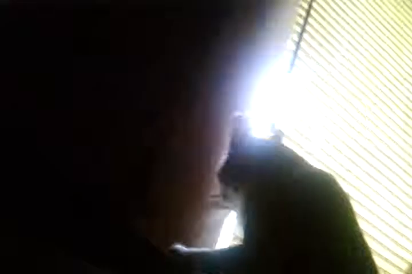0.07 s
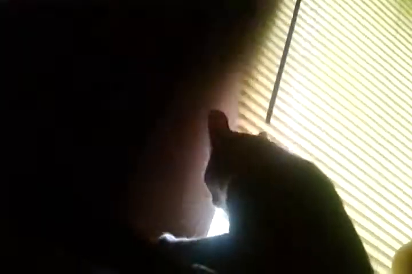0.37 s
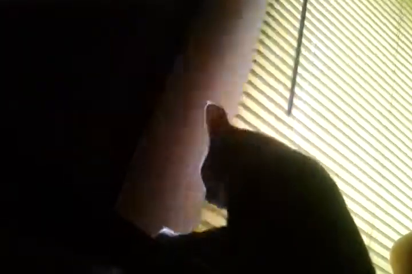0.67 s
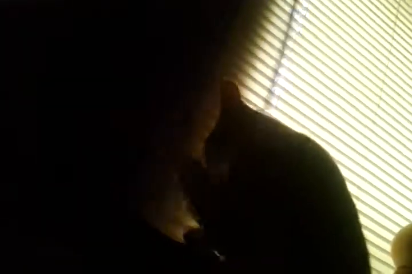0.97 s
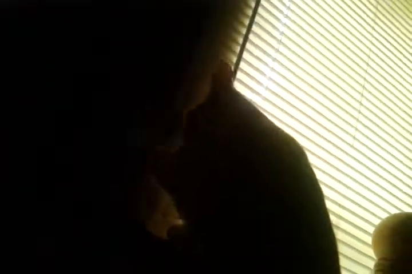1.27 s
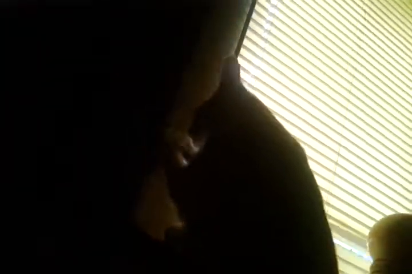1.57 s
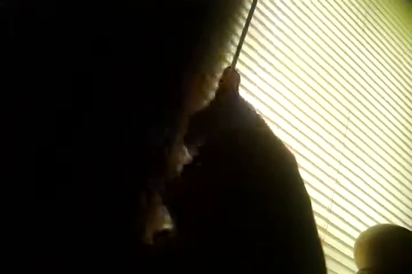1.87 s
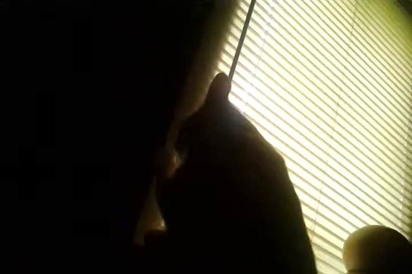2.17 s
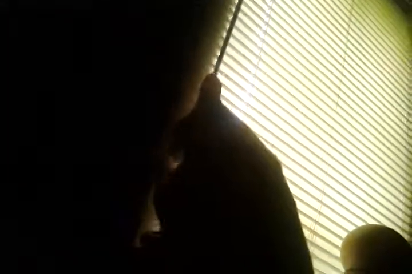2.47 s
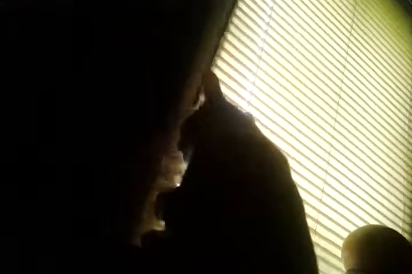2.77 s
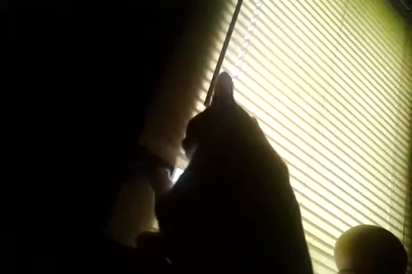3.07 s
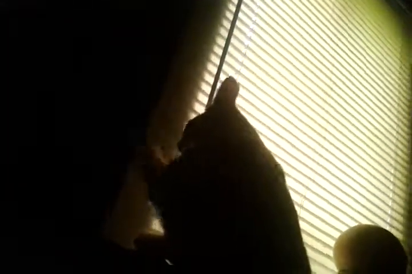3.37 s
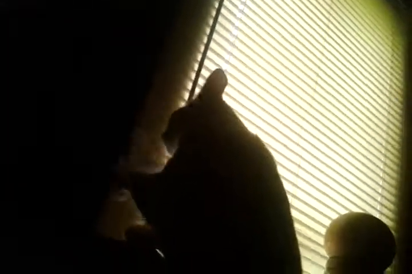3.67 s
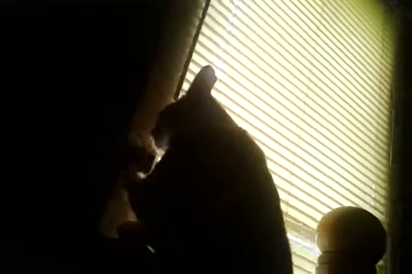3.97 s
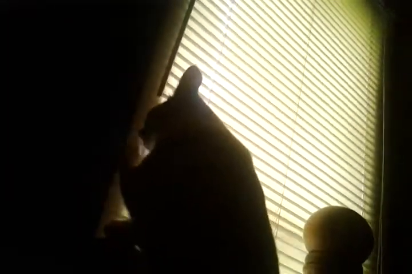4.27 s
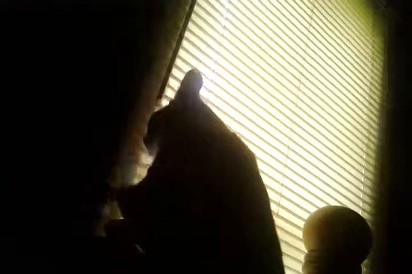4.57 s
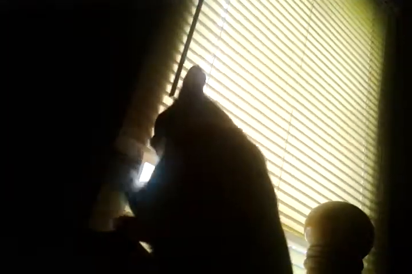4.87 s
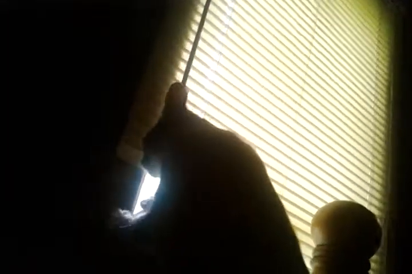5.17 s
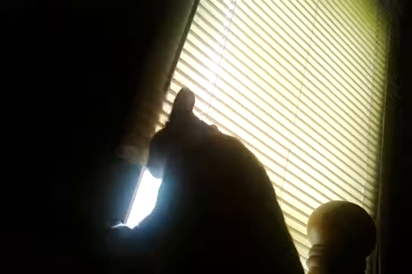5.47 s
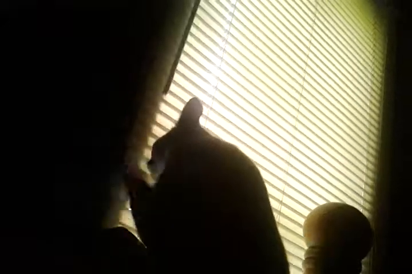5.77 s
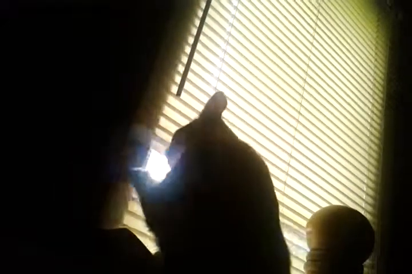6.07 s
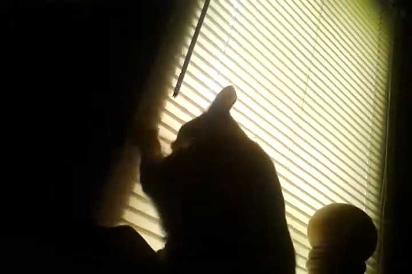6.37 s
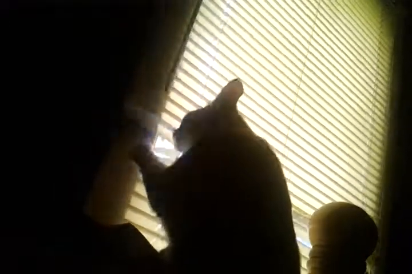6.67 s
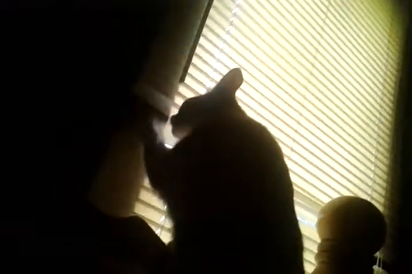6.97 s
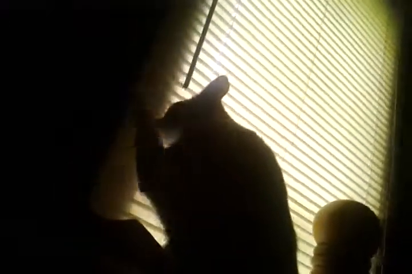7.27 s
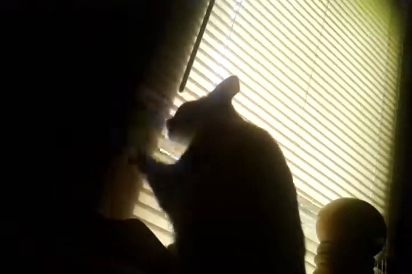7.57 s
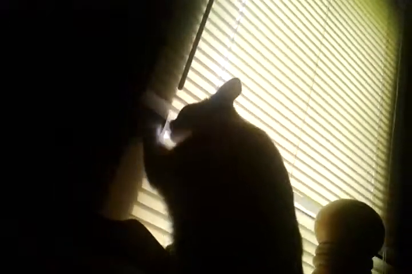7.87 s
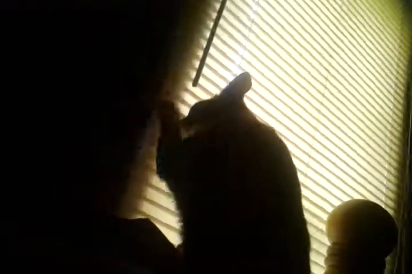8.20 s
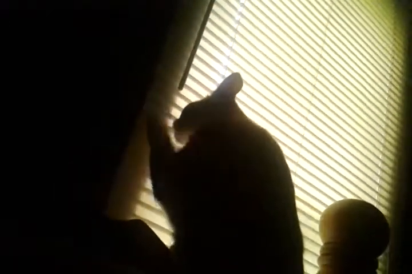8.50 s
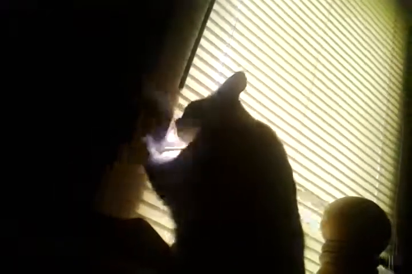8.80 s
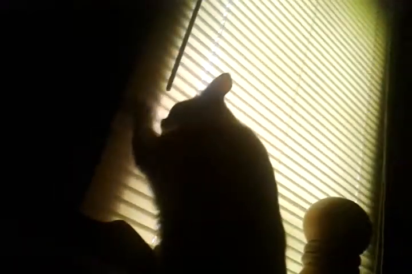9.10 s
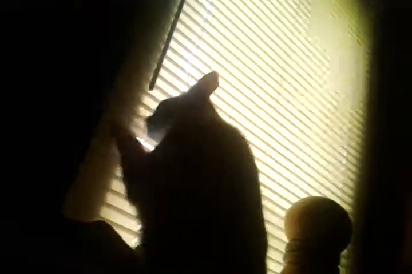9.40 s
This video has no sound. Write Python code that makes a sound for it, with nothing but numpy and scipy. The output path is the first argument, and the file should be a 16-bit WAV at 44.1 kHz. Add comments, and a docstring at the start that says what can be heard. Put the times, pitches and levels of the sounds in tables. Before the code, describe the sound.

Window blinds rustle, click and clatter in short bursts under a cat's paw, with a few soft bumps over faint hiss.

```python
"""A small quiet room, where a cat paws at slatted window blinds about twice a second.
In each stroke the paw lands with a soft knock, drags ever more brightly over the slats by stick-slip
friction and slips off; bent slats slap back in short runs, each impact exciting their resonances.
Now and then something bumps softly, probably the cat against the sill. Mains hum and hiss lie underneath."""
import sys
import numpy as np
from scipy import signal
from scipy.fft import rfft, irfft, next_fast_len
from scipy.io import wavfile

SR = 44100
rng = np.random.default_rng(int(sys.argv[2]) if len(sys.argv) > 2 else 0)


def inscribe(sig):
    """Save sig as 16-bit PCM at rate SR to the path in sys.argv[1].

    A 1-D sig is mono; a 2-D sig holds one channel per row.
    Samples are clipped to [-1, 1] before scaling.
    """
    pcm = np.round(np.clip(np.atleast_2d(sig).T, -1, 1) * 32767)
    wavfile.write(sys.argv[1], SR, pcm.astype(np.int16))


N = 425124

# Spectra of the hiss, the friction, the reverberation and the microphone.
# Each row: frequency in Hz, relative gain in dB.
HISS_SPECTRUM = [(25, -31), (45, -17), (80, -16), (120, -6), (180, -5.5), (400, -5.5), (680, -6.5),
                 (900, -8), (1200, -8.5), (1600, -11), (2000, -14), (3200, -16), (4500, -18), (6300, -19),
                 (8800, -31.5)]
FRICTION_SPECTRUM = [(150, -50.5), (250, -20.5), (511, -10.5), (559, -17.5), (699, -5), (765, -6.5),
                     (1030, -4), (1110, -8), (1410, -9), (1840, -14), (3200, -7.5), (4440, -14.5),
                     (5800, -11.5), (7050, -16.5), (8810, -43), (11500, -83), (19400, -120)]
REVERB_SPECTRUM = [(80, -3), (200, 2), (450, -1.5), (750, -4.5), (1250, -1.5), (1900, -1), (3200, -2.5),
                   (4400, 1.5), (6000, 1.5), (8500, 1.5)]
MIC_RESPONSE = [(40, -0.5), (400, 0), (1200, 1.5), (1800, 0.5), (2600, 0.5), (4300, 2), (6200, 0.5),
                (7200, 0), (7900, -7.5), (8800, -16)]
# Runs of slats slapping back. Each row: start in seconds, length in seconds (zero for a single slap),
# relative knock level in dB, pitch of the first knock in Hz, relative snap level in dB.
SLAP_RUNS = [(0.83, 0, -51.5, 1270, -49), (1.28, 0, -40.5, 680, -47.5), (1.352, 0, -37.5, 1310, -61),
             (1.433, 0, -42, 1100, -53.5), (1.827, 0, -47, 610, -50.5), (1.9, .008, -31, 1210, -38.5),
             (1.932, 0.00011, -34, 1000, -33.5), (2.187, 0.0092, -35.5, 1100, -42),
             (2.408, 0, -43.5, 990, -53), (2.539, 0.00028, -34.5, 890, -42.5), (2.722, 0, -55, 1100, -49.5),
             (2.985, 0.0046, -34, 980.7, -38.5), (3.38, 0.00018, -46.5, 818, -45.5),
             (3.444, 0, -41, 1080, -46.5), (3.689, 0.00012, -40, 1200, -43),
             (3.73, 0.00015, -41.5, 956, -33), (3.761, 0.00045, -34.5, 1040, -38.5),
             (3.796, .016, -30, 1210, -36), (4.184, .025, -29.5, 916, -36.5), (4.522, 0, -51, 1350, -44.5),
             (4.594, 0.00037, -34, 1280, -39.5), (4.639, 0, -35, 670, -37.5), (4.658, 0, -27.5, 905, -35),
             (5.057, 0, -53, 1200, -45.5), (5.212, .004, -24.5, 800, -35.5), (5.261, 0, -41.5, 732, -36),
             (5.584, 0, -61, 889.7, -41.5), (5.669, 0.0005, -37, 1150, -44.5),
             (5.712, 0.00013, -43, 1201, -44), (5.927, 0.00027, -39.5, 1290, -42.5),
             (6.275, 0, -48.5, 670, -45.5), (6.367, 0.00024, -28.5, 950.3, -36),
             (6.843, .009, -30.5, 1150, -35), (6.867, 0, -35, 1069, -30), (7.031, 0, -41.5, 940, -44),
             (7.131, 0, -33.5, 721, -41.5), (7.253, 0.00012, -34.5, 730, -39),
             (7.274, .007, -25.5, 1240, -32.5), (7.293, 0, -28, 1150, -31), (7.309, 0, -39, 1250, -35),
             (7.544, 0.00047, -40, 684, -44.5), (7.712, 0, -29, 683.5, -28.5), (7.719, 0, -26, 1230, -30.5),
             (8.119, 0, -27.5, 795.6, -31), (8.13, .024, -38.5, 960, -36),
             (8.434, 0.00029, -43, 659, -39.5), (8.555, 0.019, -28, 869.4, -35.5),
             (8.763, 0.00034, -38.5, 890, -41.5), (8.98, 0.00023, -26.5, 890, -34),
             (9.001, 0, -37, 990, -28.5), (9.012, .016, -25.5, 1020, -33), (9.299, 0, -38, 724, -48),
             (9.489, 0.0002, -39, 1000, -41), (9.51, .004, -26, 1001, -35),
             (9.539, 0.00073, -35, 1170, -38)]
# Along a run the slats are struck nearer the edge. Each row: share of the run, change of knock in dB,
# change of snap in dB.
RUN_PROFILE = [(0, 0, 0), (.5, -5, -1), (1, -4.5, 1)]
# A light touch scuffs, a hard one clicks. Each row: relative snap level in dB, contact time in seconds.
CONTACT_TIMES = [(-48.5, 0.0044), (-40.5, 0.0026), (-32.5, 0.00096)]
# Broad resonances of bending slats, of their clicking edges and of the sill.
# Each row: frequency in Hz, bandwidth in Hz, gain in dB.
BENDING_MODES = [(213, 420, -11), (467, 118, -2.5), (700, 146, 1), (952, 167, 0.5), (1253, 278, -0.5)]
CLICK_MODES = [(2500, 594, -1), (3400, 630, 2), (4570, 1540, -4), (5600, 1020, 2.5), (6405, 1330, -3)]
THUD_MODES = [(170, 66, -0.5), (320, 77, -0.5), (447, 130, -8)]
# Early reflections from pane, frame and wall. Each row: mean delay in seconds, gain.
REFLECTIONS = [(.0029, 0.31), (0.01, 0.19)]
# Soft bumps on the sill. Each row: start in seconds, relative level in dB.
SILL_BUMPS = [(1.432, -39.5), (2.332, -56), (2.605, -58), (3.493, -42.5), (6.73, -53), (7.742, -49),
              (8.158, -47), (8.64, -45.5), (9.02, -57)]
# The direct thud and its returns from the walls. Each row: delay in seconds, gain.
THUD_PATHS = [(0, 1), (.023, 0.54), (.053, .3)]
# Strokes of the paw. Each row: landing and slip-off in seconds, relative levels of landing knock,
# landing snap, rub and scrape in dB, swell at the slip in dB.
PAW_STROKES = [(1.664, 1.96, -45, -50.5, -53.5, -53.5, 0), (2.07, 2.21, -38, -60, -58.5, -60, 13),
               (2.373, 2.541, -40, -58, -55, -59, 6), (2.699, 2.955, -42, -57, -59.5, -60, 10),
               (3.183, 3.29, -49, -49.5, -55.5, -57, 0), (3.583, 3.821, -41.5, -53.5, -56, -57.5, 5),
               (3.981, 4.18, -38, -41.5, -51.5, -52, 3), (4.375, 4.62, -41.5, -60, -55, -58, 11),
               (4.884, 5.21, -42, -49, -52, -50.5, 0), (5.909, 5.98, -48, -46.5, -60, -60, 0),
               (6.043, 6.16, -44.5, -45.5, -53, -54.5, 3), (6.485, 6.67, -40, -42.5, -49.5, -54.5, 0),
               (6.785, 6.845, -60, -55, -57, -54, 9), (6.98, 7.25, -47.5, -49, -50.5, -49.5, 0),
               (7.489, 7.715, -41.5, -43, -50, -51.5, 7), (7.908, 8.11, -44, -46, -49, -49.5, 8),
               (8.16, 8.225, -47, -46, -49, -47, 0), (8.35, 8.56, -47, -49, -47, -48, 2),
               (8.726, 8.985, -40, -39, -51.5, -51, 4), (9.19, 9.31, -49, -47, -49, -48.5, 0),
               (9.441, 9.51, -62, -47, -56, -53, 8)]
# The opening fade. Each row: time in seconds, gain in dB; the last gain holds.
OPENING_GAIN = [(.775, -70), (.787, -15.5), (.825, -17), (.835, -9.5), (1.1, -4.5)]

HUM_HZ, HUM_DB = 58, -71.5
SLAT_GAP_S = .017  # longest gap between the slaps of a run
SLAT_HZ, SLAT_SPREAD, PAD_HZ = 1050, .2, 860  # slat pitch, its relative scatter, landing pitch
CATCH_KNOCK_DB, CATCH_SNAP_DB = 5, 1.5  # a claw catching, added to the stroke's rub and scrape
GRIP_S, RELEASE_T60_S = .02, 0.32  # the drag sets in and dies away
RUB_SAG_DB, SCRAPE_RISE_DB = 3, 1  # change over one stroke
SCRAPE_HZ = 2000  # rub lies below, scrape above
SLIP_S, SLIP_RUB_SHARE = .055, .6  # half-width of the swell at the slip; the rub's share of its dB
MIC_CUTOFF_HZ = 8850


def undb(db):
    """Amplitude grows tenfold for every 20 dB."""
    return 10 ** (np.asarray(db) / 20)


def unit(x):
    """Energy, the sum of squares, is normalised to one."""
    return x / np.sqrt(np.sum(x ** 2))


def level(x, db):
    """Rms amplitude is set to a level in dB."""
    return x * undb(db) / np.sqrt(np.mean(x ** 2))


def decay(t, t60):
    """Damping is exponential: 60 dB in t60 seconds."""
    return np.exp(-np.log(1000) * t / t60)


def add(track, s, sound):
    """Superposition: a sound joins the track at s seconds."""
    start = int(s * SR)
    part = sound[:max(len(track) - start, 0)]
    track[start:start + len(part)] += part


def colour(x, spectrum):
    """Filtering multiplies the spectrum by a gain curve."""
    hz, db = np.transpose(spectrum)
    size = next_fast_len(2 * len(x))
    log_hz = np.log(np.fft.rfftfreq(size, 1 / SR) + 1)
    gain = undb(np.interp(log_hz, np.log(hz), db))
    return irfft(rfft(x, size) * gain, size)[:len(x)]


def high_pass(x, hz):
    """A second-order filter sheds 12 dB an octave below its corner."""
    return signal.sosfilt(signal.butter(2, hz, "high", fs=SR, output="sos"), x)


def wander(rate_hz):
    """Interpolated noise drifts with a spread near one."""
    steps = rng.standard_normal(N // 100)
    return np.interp(np.arange(N) / SR * rate_hz, np.arange(len(steps)), steps)


def hiss_and_hum():
    """Broadband noise lies over mains hum, which wavers by slight phase modulation."""
    hum = np.sin(2 * np.pi * HUM_HZ * np.arange(N) / SR + .12 * wander(rate_hz=5))
    hiss = colour(rng.standard_normal(N), HISS_SPECTRUM)
    return level(hiss, -57.0) + level(hum, HUM_DB)


def slat_pitch():
    """Knock pitches scatter log-normally from slat to slat."""
    return SLAT_HZ * np.exp(SLAT_SPREAD * rng.standard_normal())


def slaps():
    """Elastic recoil: bent slats let go in turn, the later blows less knock and more snap."""
    shares, knock_change, snap_change = np.transpose(RUN_PROFILE)
    for s, length_s, knock_db, knock_hz, snap_db in SLAP_RUNS:
        for share in np.linspace(0, 1, 1 + int(np.ceil(length_s / SLAT_GAP_S))):
            yield (s + share * length_s, knock_db + np.interp(share, shares, knock_change),
                   slat_pitch() if share else knock_hz, snap_db + np.interp(share, shares, snap_change))


def contact(t, contact_s):
    """An impact's force peaks at contact_s and lets go."""
    return unit(t * np.exp(-t / contact_s))


def grains(size, per_s, spread_db):
    """Tiny contacts of uneven strength arrive as a Poisson process."""
    present = rng.random(size) < per_s / SR
    return present * np.sign(rng.standard_normal(size)) * undb(spread_db * rng.standard_normal(size))


def chatter(t, contact_s, per_s, t60, db):
    """Incoherent contacts add in power: one rough blow, then ever weaker taps of neighbouring slats."""
    envelope = decay(t, t60) * np.minimum(t / .004, 1)
    taps = undb(db) * unit(grains(len(t), per_s, spread_db=3.5) * envelope + 1e-9)
    taps[0] = 1
    power = signal.fftconvolve(taps ** 2, contact(t, contact_s) ** 2)[:len(t)]
    return np.sqrt(np.abs(power)) * rng.standard_normal(len(t))


def resonate(x, modes):
    """Modal superposition: band-pass resonances sum with alternating signs."""
    return sum((-1) ** k * undb(db) * signal.lfilter(*signal.iirpeak(hz, hz / width, fs=SR), x)
               for k, (hz, width, db) in enumerate(modes))


def slats(blows):
    """Impact excitation: a slat knocks in its bending modes while its edge snaps against the next."""
    out, t = np.zeros(N), np.arange(SR // 3) / SR
    for s, knock_db, knock_hz, snap_db in blows:
        contact_s = np.interp(snap_db, *np.transpose(CONTACT_TIMES))
        # the free length of slat gives each knock a few cycles of its own pitch
        span = unit(np.sin(2 * np.pi * knock_hz * t) * contact(t, 0.00081 + 0.15 * contact_s))
        body = unit(resonate(chatter(t, contact_s, per_s=400, t60=0.11, db=-1), BENDING_MODES))
        knock = high_pass(span + 1.11 * body, hz=138)
        edge_force = chatter(t, 0.76 * contact_s, per_s=200, t60=.09, db=-6)
        snap = unit(high_pass(resonate(edge_force, CLICK_MODES), hz=1210))
        sound = undb(knock_db + 18.5) * knock + undb(snap_db + 24.5) * snap
        add(out, s, room(sound, wet_db=-4.0))
        # a reversed decay: the slat slides ever faster just before it lets go
        slide = unit(resonate(rng.standard_normal(len(t)) * decay(t, .05), BENDING_MODES + CLICK_MODES))
        add(out, s - t[-1], undb(knock_db + 7.0) * slide[::-1])
    return out


def room(x, wet_db, low_t60=0.27, high_t60=0.23):
    """Reverberation: early reflections and a short diffuse tail whose treble dies first."""
    t = np.arange(SR // 3) / SR
    noise = rng.standard_normal(len(t))
    low = signal.sosfilt(signal.butter(2, 1600, fs=SR, output="sos"), noise)
    high = high_pass(noise, hz=1600)
    tail = (low * decay(t, low_t60) - high * decay(t, high_t60)) * np.minimum(t / 0.0051, 1)
    response = undb(wet_db) * colour(unit(tail), REVERB_SPECTRUM)
    response[0] += 1  # direct sound
    for delay_s, gain in REFLECTIONS:  # each spot on the blinds has its own paths
        add(response, delay_s * rng.uniform(.75, 1.25), np.array([gain]))
    return signal.fftconvolve(x, response)[:len(x)]


def sill_bumps():
    """Dispersion: after a padded blow the higher bending waves arrive first, so the thud sinks in pitch."""
    out, t = np.zeros(N), np.arange(SR // 3) / SR
    for s, db in SILL_BUMPS:
        hz = (152 + 200 * np.exp(-t / 0.0075)) * (1 + 0.038 * rng.standard_normal())
        thud = unit(np.sin(2 * np.pi * np.cumsum(hz) / SR) * t * np.exp(-(t / 0.016) ** 2))
        shudder = unit(resonate(rng.standard_normal(len(t)) * contact(t, 0.0068), THUD_MODES))
        sound = undb(db + 26.5) * high_pass(thud + 0.97 * shudder, hz=95)
        for delay_s, gain in THUD_PATHS:
            add(out, s + delay_s, gain * sound)
    return out


def paw_touches(catches=2):
    """Impacts of a stroke: the paw lands on one slat, then its claws catch on others."""
    for lands_s, off_s, knock_db, snap_db, rub_db, scrape_db, _ in PAW_STROKES:
        yield lands_s, knock_db, PAD_HZ, snap_db
        for share in (np.arange(catches) + rng.random(catches)) / catches:
            catch_s = lands_s + share * (off_s - lands_s)
            yield catch_s, rub_db + CATCH_KNOCK_DB, slat_pitch(), scrape_db + CATCH_SNAP_DB


def stroke_envelopes():
    """Friction follows the stroke: it grips, turns from rub to scrape, swells at the slip and dies away."""
    rub, scrape, t = np.zeros(N), np.zeros(N), np.arange(SR) / SR
    for lands_s, off_s, _, _, rub_db, scrape_db, slip_db in PAW_STROKES:
        length_s = off_s - lands_s
        progress = np.minimum(t / length_s, 1) - .5  # zero at mid-stroke
        hold = np.minimum(t / GRIP_S, 1) * decay(np.maximum(t - length_s, 0), RELEASE_T60_S)
        swell_db = slip_db * np.exp(-((t - length_s) / SLIP_S) ** 2)
        add(rub, lands_s, hold * undb(rub_db - RUB_SAG_DB * progress + SLIP_RUB_SHARE * swell_db))
        add(scrape, lands_s, hold * undb(scrape_db + SCRAPE_RISE_DB * progress + swell_db))
    return rub, scrape


def paw_drag(edges=4):
    """Stick-slip friction: fur and claws crackle over slat edges, brighter as the paw speeds up."""
    out = np.zeros(N)
    rub_gain, scrape_gain = stroke_envelopes()
    for _ in range(edges):
        crackle = level(grains(N, per_s=900, spread_db=5), 0)
        rustle = level(rng.standard_normal(N), -4.5)
        grip = undb(4.7 * wander(rate_hz=35))
        friction = level(colour((crackle + rustle) * grip, FRICTION_SPECTRUM), -1.46)
        rub = signal.sosfiltfilt(signal.butter(2, SCRAPE_HZ, fs=SR, output="sos"), friction)
        scrape = friction - rub
        out += room(rub * rub_gain + scrape * scrape_gain, wet_db=-5.0)
    return out / np.sqrt(edges)


def scene():
    """Superposition: blinds, sill and background sum in one channel."""
    return (slats(slaps()) + slats(paw_touches()) + paw_drag() + sill_bumps() + hiss_and_hum())[None]


def record(dry):
    """Band limiting: a small microphone colours the sound and cuts its top; the level fades in."""
    gain_db = np.interp(np.arange(N) / SR, *np.transpose(OPENING_GAIN))
    sound = colour(dry[0], MIC_RESPONSE) * undb(gain_db)
    return signal.sosfilt(signal.ellip(10, .2, 70, MIC_CUTOFF_HZ, fs=SR, output="sos"), sound)[None]


dry = scene()
out = record(dry)
inscribe(out)
```